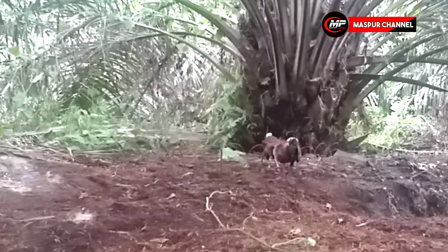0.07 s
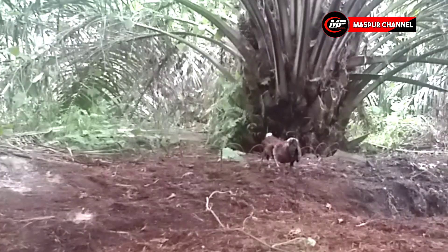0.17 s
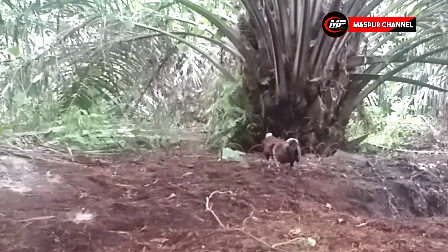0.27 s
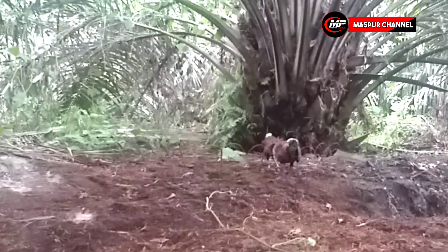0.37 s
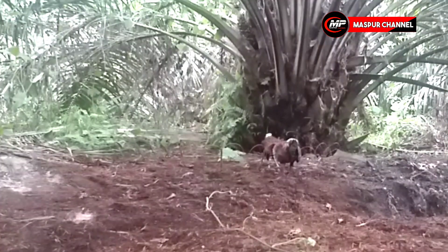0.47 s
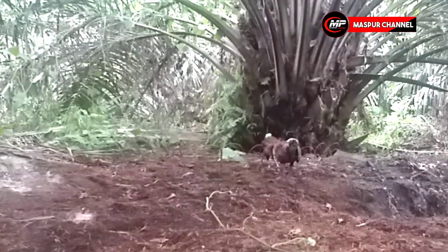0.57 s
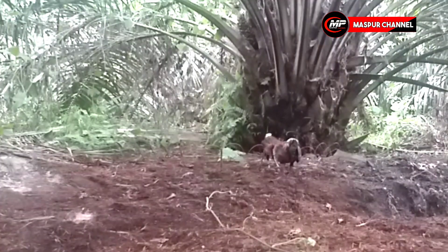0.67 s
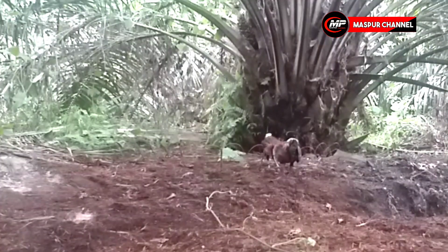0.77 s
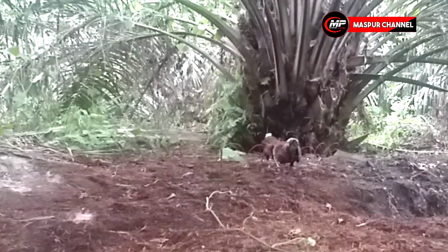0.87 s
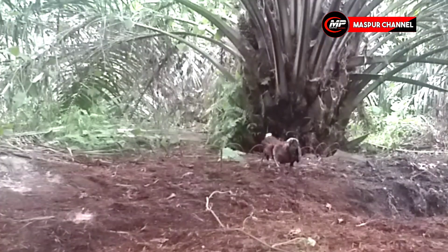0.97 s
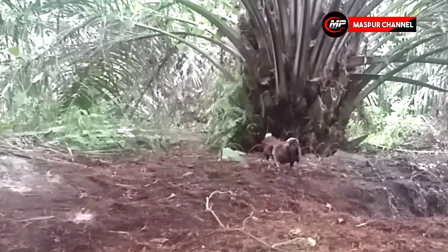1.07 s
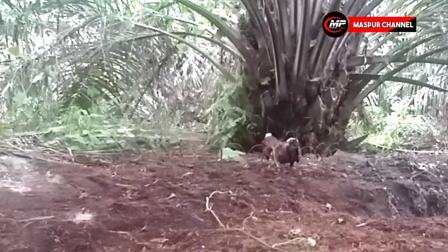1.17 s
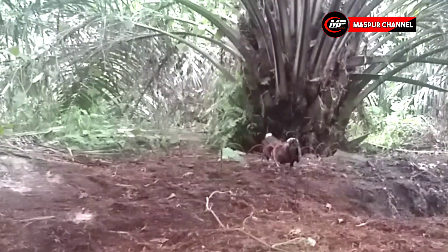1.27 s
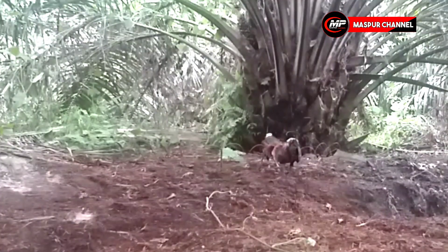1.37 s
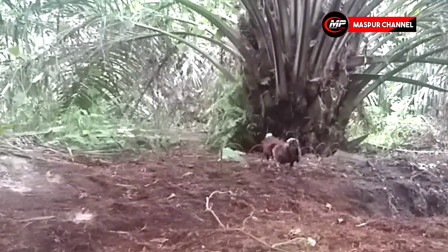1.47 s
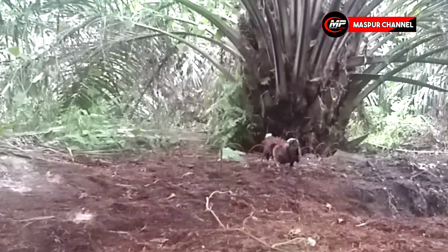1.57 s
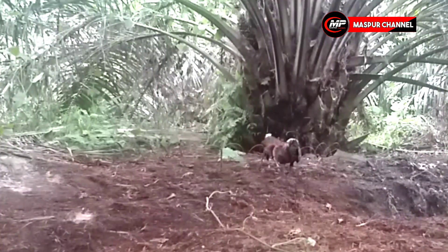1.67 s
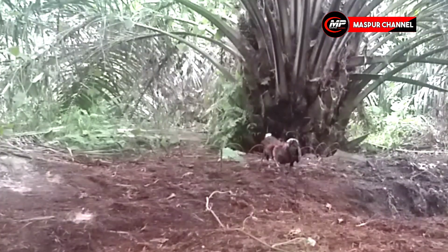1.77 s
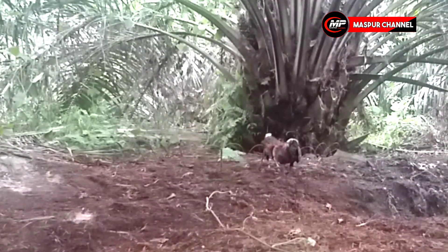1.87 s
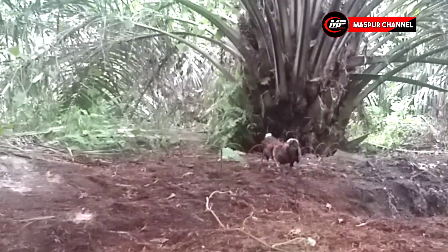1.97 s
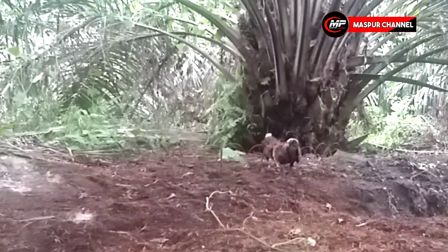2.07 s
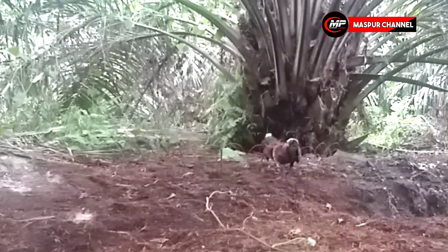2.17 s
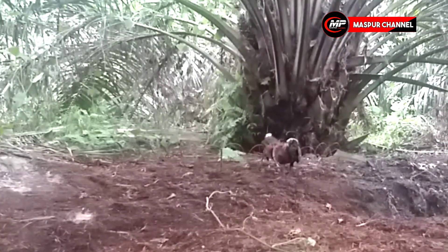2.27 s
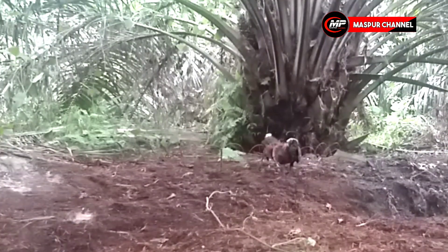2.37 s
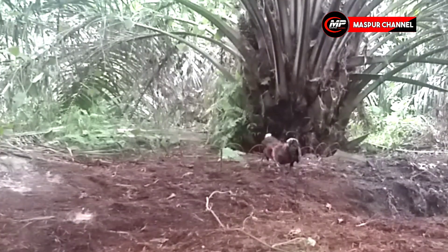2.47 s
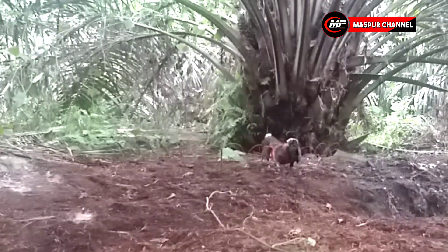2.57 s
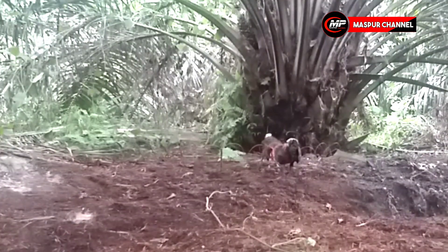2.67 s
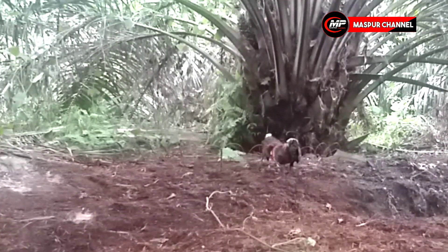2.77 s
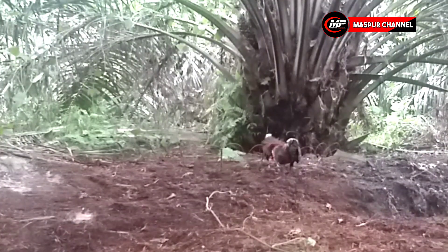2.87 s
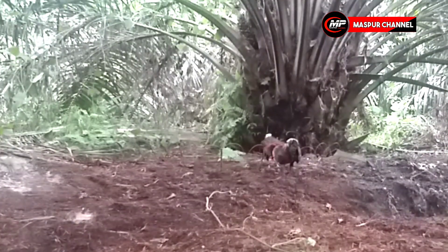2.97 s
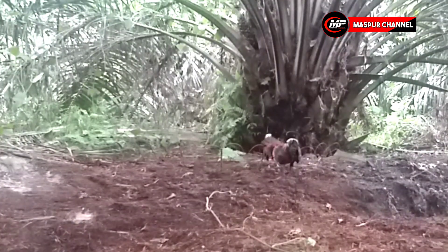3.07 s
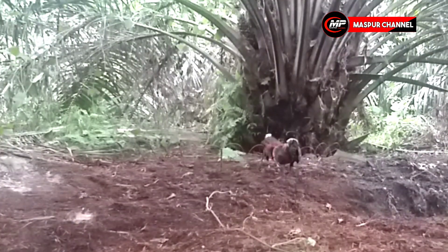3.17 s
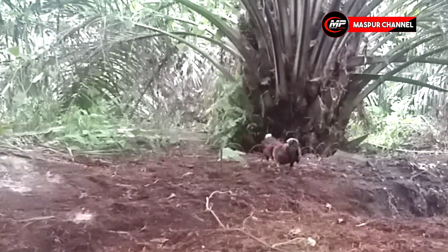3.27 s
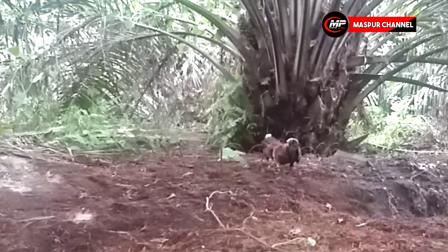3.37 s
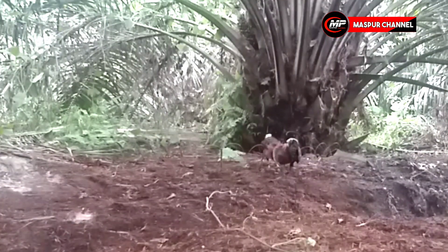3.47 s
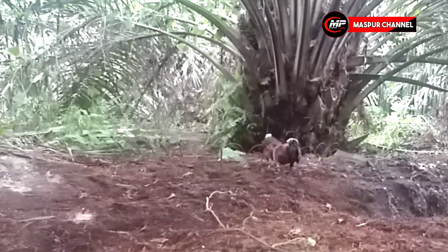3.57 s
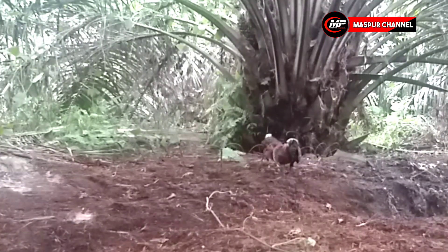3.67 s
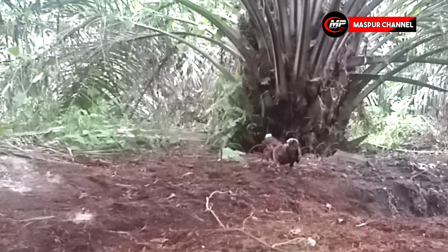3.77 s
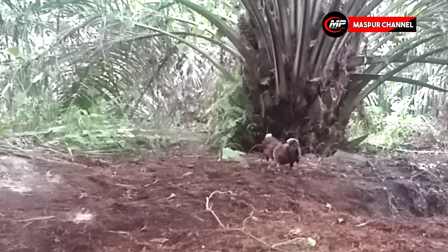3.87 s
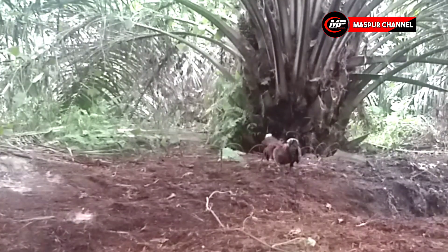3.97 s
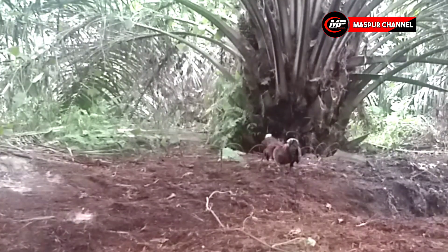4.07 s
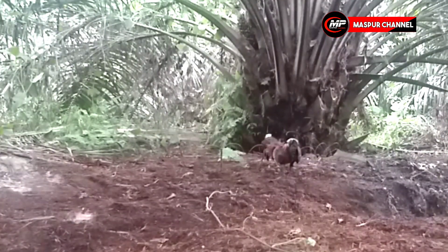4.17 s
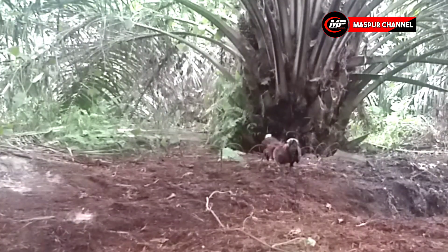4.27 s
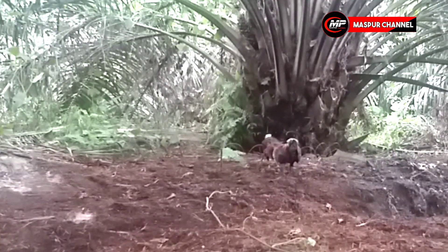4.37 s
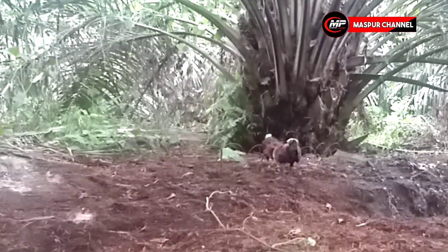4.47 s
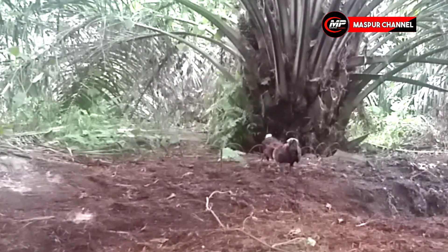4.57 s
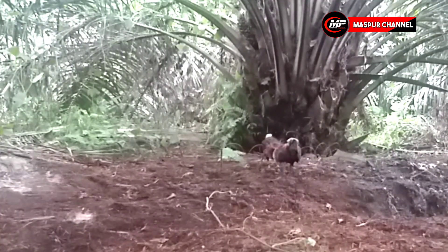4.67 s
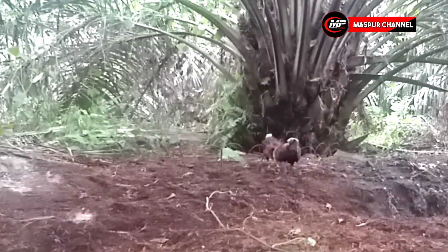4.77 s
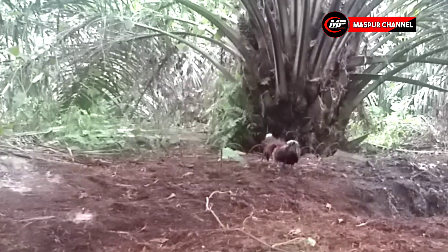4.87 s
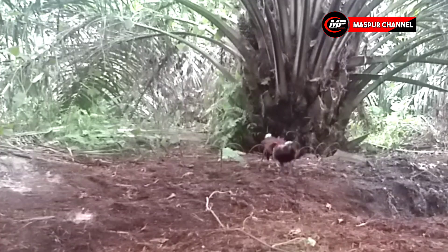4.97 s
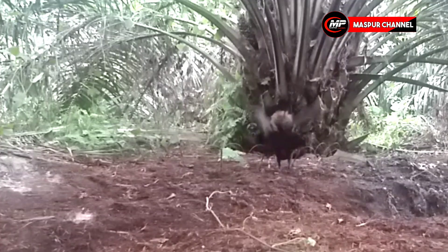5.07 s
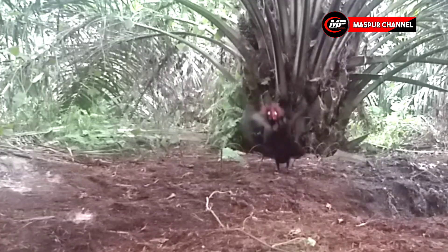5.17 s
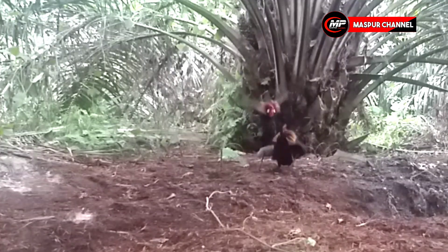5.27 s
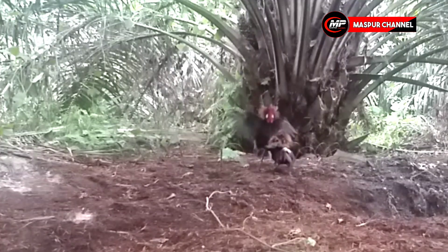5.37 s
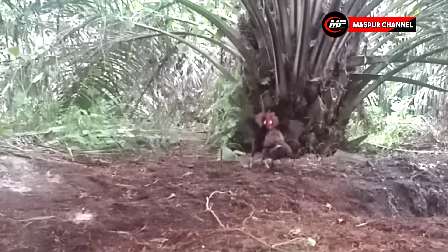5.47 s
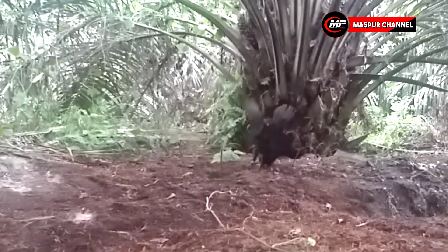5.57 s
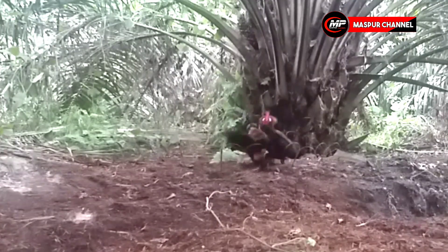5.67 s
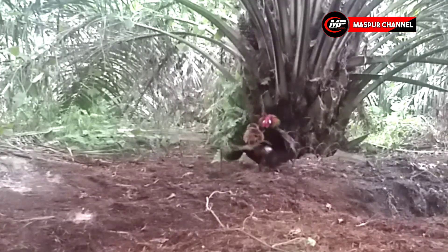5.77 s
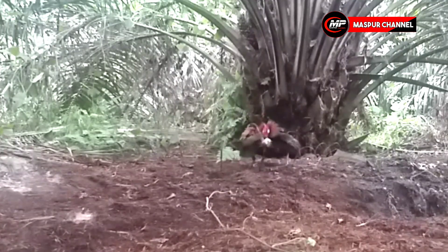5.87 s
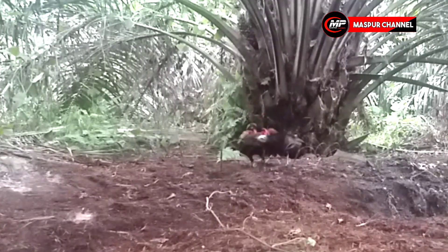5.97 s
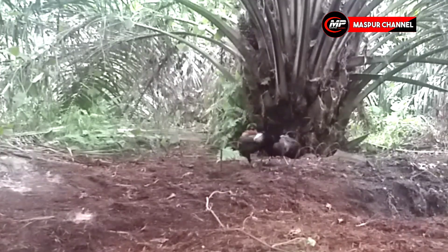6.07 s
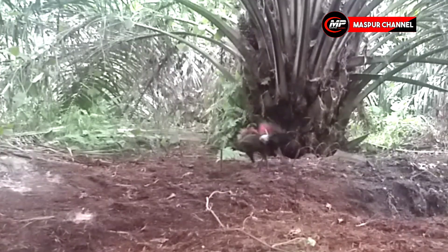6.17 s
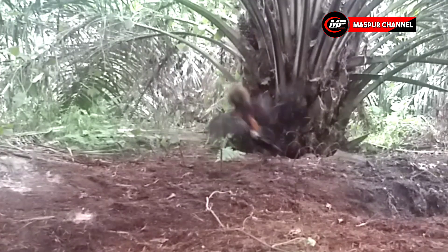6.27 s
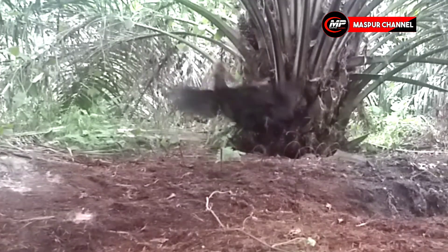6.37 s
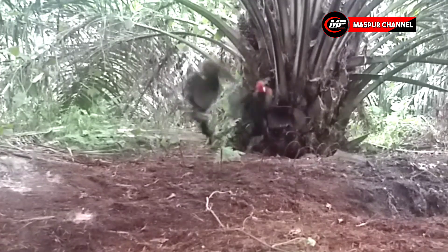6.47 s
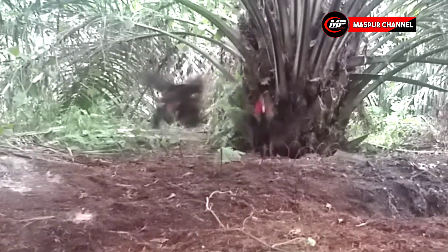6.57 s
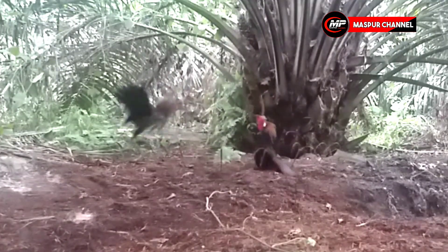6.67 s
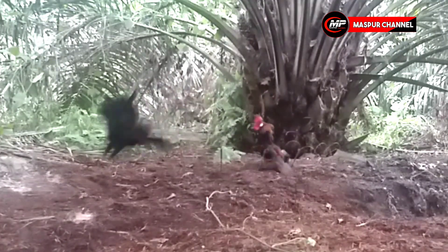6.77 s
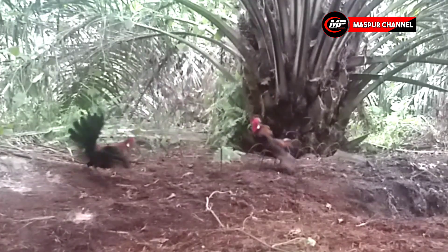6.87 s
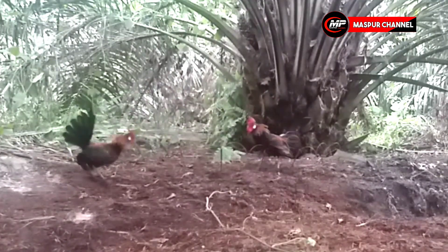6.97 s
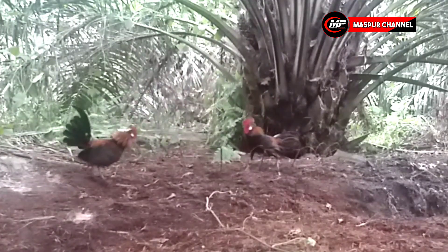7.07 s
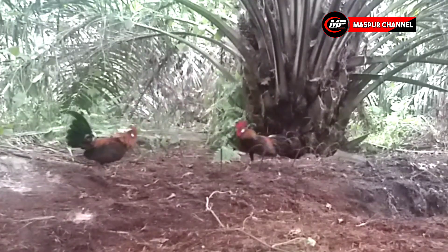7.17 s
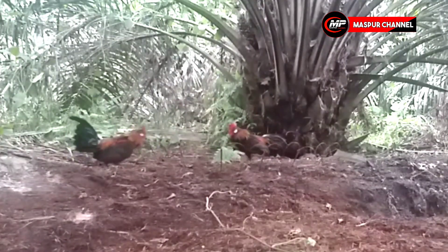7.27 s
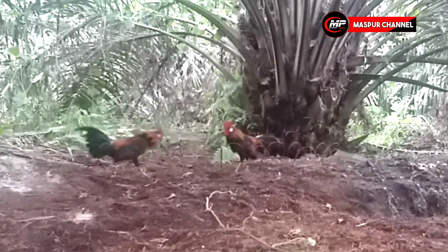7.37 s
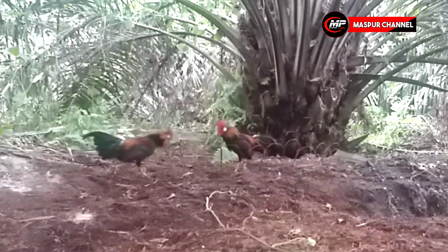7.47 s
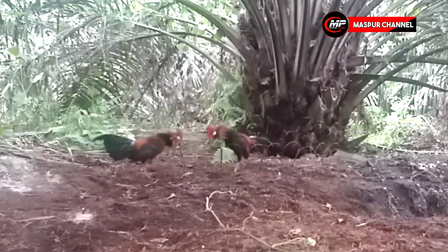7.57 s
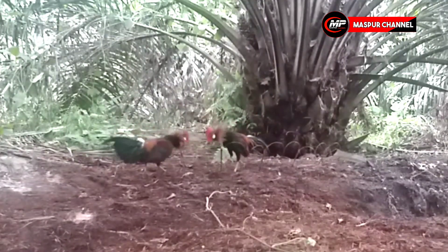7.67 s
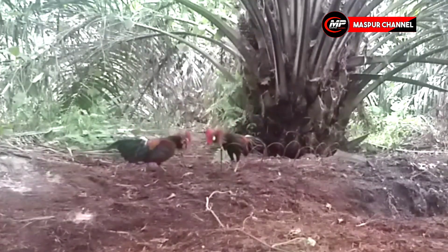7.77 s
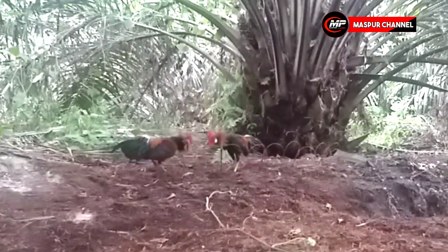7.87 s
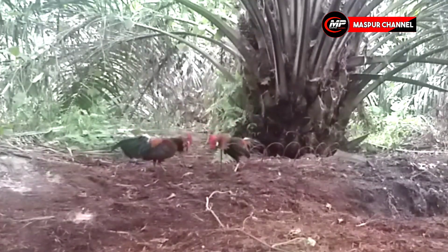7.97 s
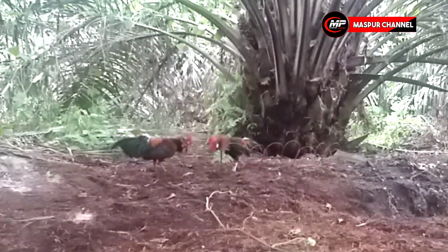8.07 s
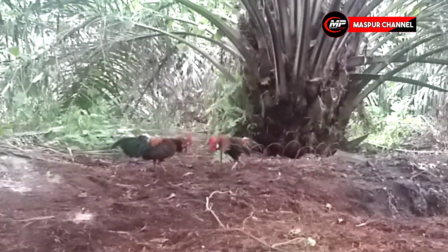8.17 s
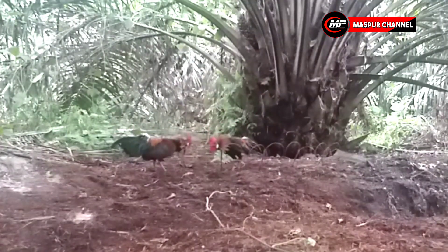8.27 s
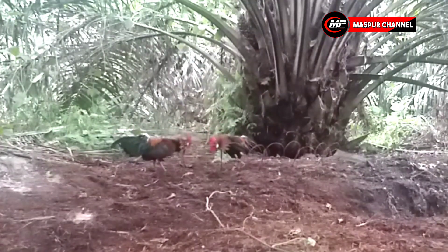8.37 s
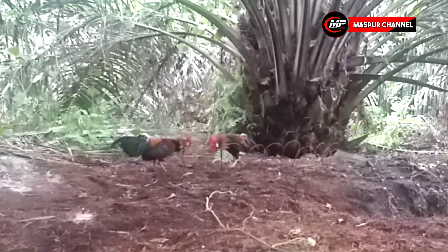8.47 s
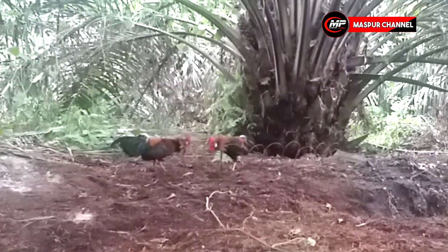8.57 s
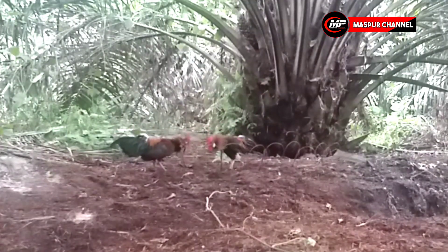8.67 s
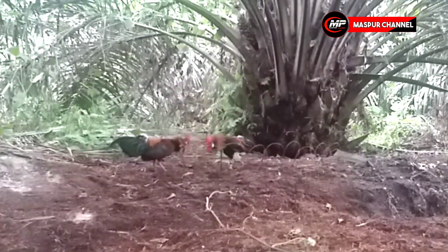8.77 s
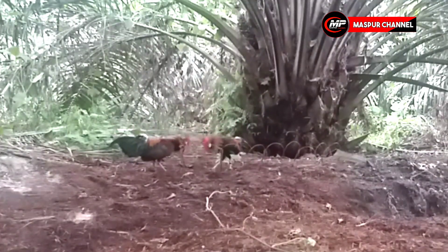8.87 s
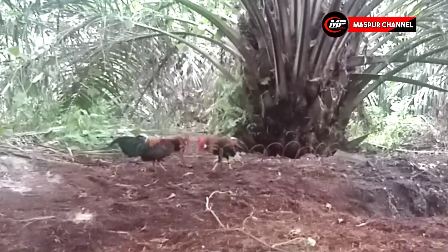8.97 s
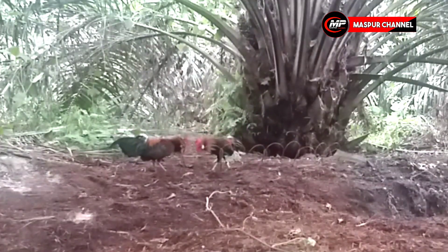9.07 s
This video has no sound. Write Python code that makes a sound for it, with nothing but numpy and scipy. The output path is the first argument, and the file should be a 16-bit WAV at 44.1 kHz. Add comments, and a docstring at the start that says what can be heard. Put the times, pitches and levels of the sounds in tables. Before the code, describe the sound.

In a palm grove, an insect close to the microphone rasps in high pulsing phrases over a distant insect chorus, a low rumble and soft hiss. A small bird gives falling chirps, then a run of quick pips. Past the middle, two roosters scuffle in dry litter and clap their wings in a short, loud burst, while a very faint crow sounds far away. A few light scuffs follow and the insects carry on.

```python
"""Two junglefowl roosters spar under a palm, scuffling in dry litter, then leaping with a burst of wing claps.
Close to the microphone an insect rasps its wings in pulsing phrases; a far chorus and a thin cricket lie behind.
A small bird slurs and pips, and a cock crows faintly from far off. Trunks and fronds scatter the calls and
the fight, over a low distant rumble and an even hiss."""
import sys
import numpy as np
from scipy import signal
from scipy.fft import rfft, irfft, next_fast_len
from scipy.io import wavfile
from scipy.ndimage import uniform_filter1d, map_coordinates

SR = 44100
rng = np.random.default_rng(int(sys.argv[2]) if len(sys.argv) > 2 else 0)


def log_audio(samples):
    """Write samples as a 16-bit WAV file to the path given in sys.argv[1]."""
    # one column per channel
    frames = np.atleast_2d(samples).T
    # limit to full scale, then quantise
    limited = np.clip(frames, -1, 1)
    pcm = np.round(limited * 32767).astype(np.int16)
    wavfile.write(sys.argv[1], SR, pcm)


N = 401751
T = np.arange(N) / SR


def amp(db):
    """Decibels to gain."""
    return 10 ** (np.asarray(db) / 20)


def unit(x):
    """Scale to rms 1."""
    return x / np.sqrt(np.mean(x ** 2) + 1e-20)


def along(points, hz):
    """Read a curve of (frequency, value) points on a log frequency axis."""
    freqs, values = np.transpose(points)
    return np.interp(np.log(hz + 1), np.log(freqs + 1), values)


def wobble(rate):
    """A smooth random curve, rate knots a second."""
    knots = rng.standard_normal(int(N * rate / SR) + 4)
    fine = np.arange(4 * len(knots)) / 4
    return np.interp(T * rate, fine, map_coordinates(knots, [fine]))


def filtered(x, response):
    """Pass x through a frequency response."""
    size = next_fast_len(N + 8192)
    return irfft(rfft(x, size) * response(np.fft.rfftfreq(size, 1 / SR)), size)[..., :N]


def noise(spectrum):
    """Coloured noise of rms 1."""
    size = next_fast_len(N, real=True)
    colour = amp(along(spectrum, np.fft.rfftfreq(size, 1 / SR)))
    return unit(irfft(rfft(rng.standard_normal(size)) * colour, size)[:N])


def add(track, start_s, sound):
    """Mix a sound into a track."""
    start = max(round(start_s * SR), 0)
    part = track[start:start + len(sound)]
    part += sound[:len(part)]


def swell(start, end, attack, growth, release):
    """Gain that sets in, grows until the end and dies away; slopes in dB a second."""
    onset_db = -attack * np.maximum(start - T, 0)
    return amp(onset_db - growth * np.maximum(end - T, 0) - release * np.maximum(T - end, 0))


def series(start_s, gap_s, change_s, count):
    """Times of a run whose gap changes by the same amount at each step."""
    k = np.arange(count)
    return start_s + gap_s * k + change_s * k ** 2 / 2


# Decay of the grove around the microphone: freq_hz, t60_s
GROVE_DECAY = [(100, 0.32), (600, 0.29), (2000, 0.54), (5000, 0.57), (12000, 0.32)]


def grove(x, reach):
    """Scatter from trunks and fronds, as strong as x; reach scales the decay time."""
    hz, t, bands = signal.stft(rng.standard_normal(SR), SR, nperseg=256)
    t60 = reach * along(GROVE_DECAY, hz)[:, None]
    onset = 1 - np.exp(-t / 0.002)
    tail = signal.istft(bands * amp(-60 * t / t60) * onset, SR, nperseg=256)[1]
    return signal.fftconvolve(x, tail / np.linalg.norm(tail))[:len(x)]


# Rumble from far away: freq_hz, level_db
RUMBLE_SPECTRUM = [(20, -56), (30, -40), (40, -9.5), (56, 3.5), (80, -0.5), (115, -2.5), (170, -7),
                   (215, -18), (300, -19.5), (420, -29), (600, -33), (1100, -77)]
# Hiss in the centre: freq_hz, level_db
HISS_SPECTRUM = [(300, -4), (500, -0.5), (1000, -4.5), (2000, -7.5), (3200, -7.5), (6000, -20),
                 (7500, -5.5), (10000, -9), (13000, -9), (15500, -9.5)]


def background(rumble_db=-54.5, hiss_db=-62):
    """Distant rumble and an even hiss."""
    return amp(rumble_db) * noise(RUMBLE_SPECTRUM) + amp(hiss_db) * noise(HISS_SPECTRUM)


# Hiss at the sides: freq_hz, level_db
SIDE_SPECTRUM = [(50, -10), (130, -14), (220, 4), (1000, 3.5), (3000, -1.5), (4400, -33), (7000, 10),
                 (9000, 10), (15500, -3.5)]


def side_hiss(level_db=-70):
    """A faint hiss, wide because left and right have opposite signs."""
    side = amp(level_db) * noise(SIDE_SPECTRUM)
    return np.array([side, -side])


# Phrases of the insect near the microphone: first_stroke_s, end_s, starting_strokes_per_s
INSECT_PHRASES = [(-.416, .36, 22.07), (.849, 1.66, 21.14), (2.385, 3.88, 21.17), (4.531, 5.36, 20.88),
                  (5.963, 6.56, 21.73), (7.37, 7.97, 21.6), (8.563, 9.2, 21.75)]
# Rasp of its wings: freq_hz, level_db
RASP_SPECTRUM = [(3400, -57), (3750, -30), (3980, -8.5), (4300, 5), (4600, 4), (4800, 0.5), (4950, -51),
                 (5300, -13), (5600, -29), (6100, -21.5), (6600, -34)]
# Tones that the leaves around it reinforce: centre_hz, width_hz, level_db
LEAF_RESONANCES = [(4040, 55, -8), (4044, 27, 6.5), (4030, 35, -23), (4210, 30, -23), (4460, 14, -21),
                   (4500, 14, 8.5), (4710, 20, -12.5), (4680, 13, 4.5), (4780, 14, 12.5)]


def near_insect(level_db=-45, carrier_hz=4640, sweep_hz=150, waver_hz=75, rasp_db=-1.5, wet_db=-11):
    """Each wing stroke swells, climbs and breaks off; a phrase starts low and soft, turns raspy and slows."""
    attack, release, anchor = 0.5, 0.11, 0.7  # shares of a stroke; the sweep crosses zero at the anchor
    dip_db, slowing_hz_per_s = -12, 2
    warm_up_s, cold_db, cold_drop_hz = 0.19, -4, 340
    gain, drive, pitch = np.zeros(N), np.zeros(N), np.full(N, float(carrier_hz))
    for first, end, rate in INSECT_PHRASES:
        on = (T > first - anchor / rate) & (T < end)
        age = T[on] - first
        stroke = (age * rate - slowing_hz_per_s * age ** 2 / 2 + anchor) % 1
        cold = np.clip(1 - age / warm_up_s, 0, 1)
        rise = np.minimum(stroke / attack, 1) * np.minimum((1 - stroke) / release, 1)
        gain[on] = amp(level_db + dip_db * (1 - rise) + cold_db * cold)
        drive[on] = 1 - 0.5 * cold
        pitch[on] += sweep_hz * drive[on] * (stroke - anchor) - cold_drop_hz * cold
    pitch += waver_hz * drive * wobble(500)
    tone = np.sqrt(2) * np.sin(2 * np.pi * np.cumsum(pitch) / SR)
    catching = amp(1.76 * wobble(550))  # the teeth of the wing's file catch unevenly
    buzz = gain * unit(catching * (tone + amp(rasp_db) * drive * noise(RASP_SPECTRUM)))
    hz = np.arange(3000, 6000, 4)
    leaves = sum(amp(db) * 1j * hz * width / (centre ** 2 - hz ** 2 + 1j * hz * width)
                 for centre, width, db in LEAF_RESONANCES)
    ringing = filtered(buzz, lambda f: 1 + amp(-2) * np.interp(f, hz, leaves))
    return ringing + amp(wet_db) * grove(buzz, reach=0.74)


# Insect chorus deep in the grove: freq_hz, level_db
CHORUS_SPECTRUM = [(3300, -29), (3650, -21), (3950, -2.5), (4200, 2.5), (4450, -4), (4800, -12.5),
                   (5500, -20), (6300, -36)]
# One slower insect, pitched just above it: freq_hz, level_db
THROB_SPECTRUM = [(4600, -32), (4950, 0.5), (5200, 5), (5400, 3.5), (5600, -12.5), (6000, -16),
                  (6500, -24.5)]


def far_insects(chorus_db=-56.5, growth_db_per_s=0.17, join_db=3, throb_db=-60.5, throb_hz=6.1):
    """A flickering chorus slowly gathers and swells with each near phrase; one slower insect throbs."""
    calling = sum(1.0 * ((T > first) & (T < end)) for first, end, _ in INSECT_PHRASES)
    joined = uniform_filter1d(calling, int(0.46 * SR))
    crowd = amp(chorus_db + growth_db_per_s * T + join_db * joined + 2.24 * wobble(4.13))
    lone_call = amp(-53.5) * np.exp(-((T - 4.03) / 0.049) ** 2)
    flicker = amp(1.24 * wobble(40))
    chorus = flicker * np.hypot(crowd, lone_call) * noise(CHORUS_SPECTRUM)
    throb = np.cos(2 * np.pi * (throb_hz * T + 0.13 * wobble(2.14)))
    return chorus + amp(throb_db + 2.5 * throb + wobble(60)) * noise(THROB_SPECTRUM)


# A thin, high cricket, faint at the microphone: freq_hz, level_db
CRICKET_SPECTRUM = [(7700, -41), (8100, -0.5), (8500, -3), (8650, -14), (9000, -10), (9300, -37)]


def cricket(full_db=-59, full_at_s=4.76, growth_db_per_s=5.5, half_chirp_s=0.054, pulse_hz=117):
    """Chirps that quicken, grow to full voice, hold it and stop."""
    times = series(start_s=2.605, gap_s=0.1432, change_s=-0.00086, count=24)
    chirps = sum(np.exp(-np.abs((T - s) / half_chirp_s) ** 2.4) for s in times)
    gain = amp(full_db - growth_db_per_s * np.maximum(full_at_s - T, 0))
    pulses = 1 + 0.5 * np.sin(2 * np.pi * pulse_hz * T)
    return gain * chirps * unit(noise(CRICKET_SPECTRUM) * pulses)


# Down-slurs of a small bird in the grove: middle_s, length_s, pitch_hz, fall_hz, level_db
BIRD_SLURS = [(3.06, .08, 2150, 300, -64.5), (3.188, 0.079, 2120, 302, -61), (3.333, .085, 2100, 300, -61),
              (3.492, 0.085, 2100, 300, -59.5), (4.622, 0.081, 1917, 565, -48),
              (4.762, .073, 1875, 574, -41), (5.098, .085, 1786, 374, -41),
              (7.712, 0.043, 2083, 220, -42.5)]
# Resonance of its throat: freq_hz, gain_db
BIRD_THROAT = [(1400, -31), (1600, -11), (1720, -2.5), (1900, -6.5), (2050, -0.5), (2220, -5.5), (2320, -8),
               (2600, -7)]


def bird_notes(run_start_s=5.378, low_lead_s=0.0813, sag_hz_per_s=51.2, fade_db_per_s=1.1):
    """Slurs, then pips that slow, sink and fade: middle_s, length_s, pitch_hz, fall_hz, arch_hz, level_db."""
    notes = [(s, length, hz, fall, 0, db) for s, length, hz, fall, db in BIRD_SLURS]
    for s in series(run_start_s, gap_s=0.1905, change_s=0.00156, count=12):
        age = s - run_start_s
        low_pip = (s - low_lead_s, 0.045, 1768, 0, 111, -50.5)
        high_pip = (s, 0.042, 2207 - sag_hz_per_s * age, 0, 155, -39 - fade_db_per_s * age)
        notes += [low_pip, high_pip]
    return notes


def bird(waver_hz=30, hoarse_db=3.5, trim_db=0.5, echo_db=-9.5, blur_db=-9):
    """A hoarse whistle, shaped by the throat and answered by the grove."""
    song, waver, grit = np.zeros(N), waver_hz * wobble(400), wobble(800)
    for middle, length, hz, fall, arch, db in bird_notes():
        u = np.linspace(-1, 1, int(length * SR))  # position within the note
        now = slice(int(middle * SR), int(middle * SR) + len(u))
        phase = 2 * np.pi * np.cumsum(hz - fall * u / 2 - arch * u ** 2 + waver[now]) / SR
        breaking = 0.23 + abs(fall) / 1000  # the voice breaks up more, the further it slides
        voice = (np.sin(phase) + breaking * grit[now] * np.cos(phase)) / np.hypot(1, breaking)
        add(song, middle - length / 2, amp(db + trim_db) * (1 - u ** 2) * voice)
    song *= amp(hoarse_db * wobble(250))
    sway = amp(echo_db) + amp(blur_db) * wobble(600)  # swaying fronds blur the answer
    answer = grove(song * sway, reach=1.25)
    return filtered(song + answer, lambda hz: amp(along(BIRD_THROAT, hz)))


# Syllables of a cock crowing far off: start_s, end_s, pitch_hz, level_db
CROW_SYLLABLES = [(5.22, 5.33, 530, -62.5), (5.5, 5.76, 625, -71), (5.9, 7.1, 551, -66)]


def far_crow(wet_db=-3, waver_hz=16, edge_s=0.067):
    """Only the lowest partial carries through the grove, and all of it arrives scattered."""
    call, waver = np.zeros(N), waver_hz * wobble(130)
    for start, end, hz, db in CROW_SYLLABLES:
        gain = amp(db) * np.clip(np.minimum(T - start, end - T) / edge_s, 0, 1)
        call += gain * np.sqrt(2) * np.sin(2 * np.pi * np.cumsum(hz + waver) / SR)
    return amp(wet_db) * grove(call, reach=0.78)


# Feet scuffing the litter under the palm: peak_s, level_db, rise_s, crispness_db
FOOT_SCUFFS = [(5.46, -50, 0.04, 1), (5.561, -39, 0.0023, 1.5), (5.884, -40.5, .036, -4),
               (5.95, -55, .007, 10), (6.045, -46, 0.015, -1), (6.082, -41.5, .018, 6.5),
               (6.95, -39, 0.0073, 9.5), (7.14, -46.5, .015, 1.5), (7.24, -54, .01, -19),
               (8.13, -53, 0.012, -9)]
# Soil and fibre: freq_hz, level_db
SOIL_SPECTRUM = [(150, 0), (500, -14), (900, -25), (1500, -8), (2800, -3.5), (4500, 4), (6200, -2),
                 (7600, -23.5), (10000, -40)]
# Dry leaf edges: freq_hz, level_db
DRY_LEAF_SPECTRUM = [(6500, -8), (8000, -10), (9500, -2.5), (12000, -2.5), (15500, -3)]


def scuffs(t60_s=0.17, tread_db=-60, soil_db=-3, leaf_db=-10, grain_db=5, wet_db=-4):
    """Dry litter crackles under each kick and step, and more softly under light treading."""
    treading = swell(6.5, 7.5, attack=120, growth=0, release=120)
    soil = amp(tread_db + 3 * wobble(20)) * treading
    leaves = soil * amp(3.5)  # crispness of the treading
    t = np.arange(-SR // 10, SR // 2) / SR
    for peak, db, rise, crispness in FOOT_SCUFFS:
        force = amp(db - 60 * np.maximum(t, 0) / t60_s) * np.exp(np.minimum(t, 0) / abs(rise))
        add(soil, peak + t[0], force)
        add(leaves, peak + t[0], force * amp(crispness))
    grain = unit(amp(grain_db * wobble(900)))
    scrape = amp(soil_db) * soil * noise(SOIL_SPECTRUM)
    crunch = amp(leaf_db) * leaves * noise(DRY_LEAF_SPECTRUM)
    crackle = grain * (scrape + crunch)
    return crackle + amp(wet_db) * grove(crackle, reach=0.97)


# A twig snapping, then the roosters' wing claps: time_s, level_db, snap_hz, crack_db, crack_t60_s
SNAPS_AND_CLAPS = [(6.302, -34, 4500, -8.5, .012), (6.5613, -8.5, 2880, -14.5, 0.028),
                   (6.6072, -18, 2350, -9, 0.033), (6.6272, -22, 2620, -5, .024), (6.6407, -8, 4800, -12, .008),
                   (6.6632, -19.5, 5000, -2, 0.022), (6.688, -10, 1960, -10.5, 0.042),
                   (6.7152, -32, 3500, -12, 0.011), (6.7302, -8, 3000, -8.5, .042),
                   (6.7445, -24, 2500, -0.5, 0.064), (6.9174, -13, 4900, -20, 0.013),
                   (6.9245, -36.5, 4800, -2, 0.021), (6.9612, -30, 5050, 0, 0.0066)]
# Quills and feathers: freq_hz, level_db
FEATHER_SPECTRUM = [(150, -18), (300, -2), (450, 2), (850, -9), (1150, -8.5), (1500, -8.5), (2700, -3),
                    (4000, -2.5), (5600, -2), (6600, -9.5), (7750, -20), (9300, -11.5), (11300, -9),
                    (15500, -15)]
# Air cupped under a wing: pitch_hz, t60_s, level_db
CUP_MODES = [(254, 0.021, 4), (663, 0.018, -1), (1150, 0.041, -3)]


def wing_claps(thump_db=-14, full_wing_t60_s=0.036, bounce_s=0.00123, bounce_gain=0.24, wet_db=-5):
    """A wing slaps, or once a twig snaps: a pressure snap that bounces off the ground, a crack of quills and a
    hollow thump."""
    track, t = np.zeros(N), np.arange(SR // 2) / SR
    lead_s = 0.002  # room for the front of the snap
    age = np.maximum(t - lead_s, 0)
    quills = noise(FEATHER_SPECTRUM)
    cup = sum(amp(db - 60 * age / t60) * np.sin(2 * np.pi * hz * age) for hz, t60, db in CUP_MODES)
    for k, (s, db, snap_hz, crack_db, t60) in enumerate(SNAPS_AND_CLAPS):
        u = 2 * np.pi * snap_hz * (t - lead_s)
        snap = -u * np.exp((1 - u ** 2) / 2)
        fresh_quills = np.roll(quills, k * len(t))[:len(t)]
        crack = amp(crack_db - 60 * age / t60) * (t > lead_s) * fresh_quills
        # a longer, broader slap cups more air, up to a full wing
        thump = amp(thump_db + 10 * min(np.log2(t60 / full_wing_t60_s), 0)) * cup
        slap = snap + crack + bounce_gain * np.interp(t - bounce_s, t, snap)
        scatter = amp(wet_db) * grove(slap + 0.66 * thump, reach=0.44)
        add(track, s - lead_s, amp(db) * (slap + thump + scatter))
    return track


# Flurries of wingbeats under the palm: start_s, end_s, air_db, feather_db
WING_FLURRIES = [(6.506, 6.762, -34, -36.5), (6.929, 6.948, -51, -55)]
# Air shoved by the wings: freq_hz, level_db
AIR_SPECTRUM = [(25, -23), (60, 4.5), (100, 6.5), (160, 4.5), (240, 0.5), (340, -1.5), (450, -20),
                (600, -29), (1000, -20)]


def wingbeats(air_lead_s=0.06, grain_db=2.5, wet_db=-19):
    """Beating wings shove air about while their feathers brush; each flurry builds and dies away."""
    air, feathers = np.zeros(N), np.zeros(N)
    for start, end, air_db, feather_db in WING_FLURRIES:
        air_peak = max(end - air_lead_s, start)
        air += amp(air_db) * swell(start, air_peak, attack=400, growth=47, release=142)
        feathers += amp(feather_db) * swell(start, end, attack=400, growth=35, release=122)
    brush = feathers * unit(noise(FEATHER_SPECTRUM) * amp(grain_db * wobble(500)))
    return air * noise(AIR_SPECTRUM) + brush + amp(wet_db) * grove(brush, reach=1.2)


def scene():
    """The fight and the life of the grove sit in the centre; only a faint hiss has width."""
    ambience = background() + near_insect() + far_insects() + cricket() + bird() + far_crow()
    return ambience + side_hiss() + wing_claps() + wingbeats() + scuffs()


# Colour of the camera's microphone: freq_hz, gain_db
MIC_RESPONSE = [(20, -16), (45, -0.5), (6600, 1), (7700, -7), (9000, -1), (15000, 3.5)]


def record(dry):
    """The microphone thins the deepest bass, dips in the treble and keeps nothing above its band limit."""
    limit_hz = 15650
    return filtered(dry, lambda hz: amp(along(MIC_RESPONSE, hz)) * (hz < limit_hz))


dry = scene()
out = record(dry)
log_audio(out)
```